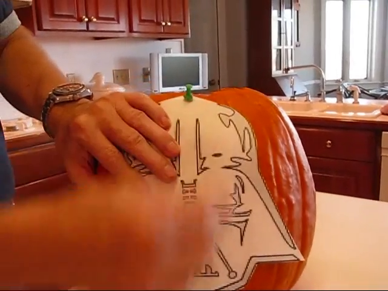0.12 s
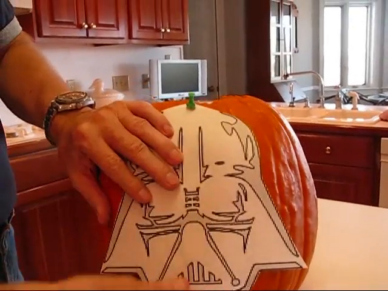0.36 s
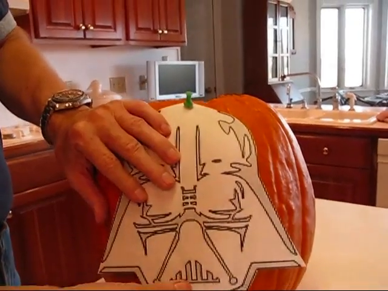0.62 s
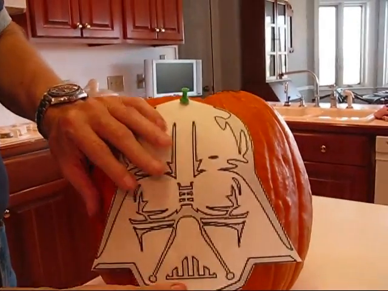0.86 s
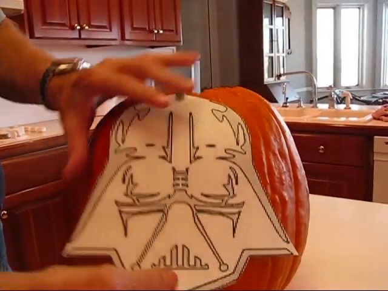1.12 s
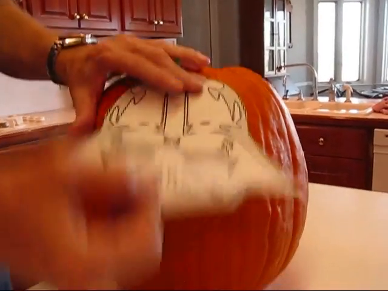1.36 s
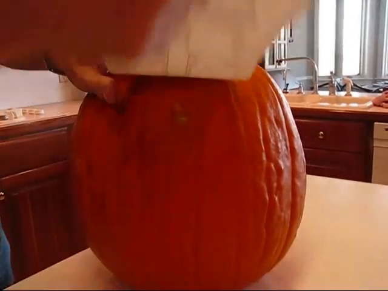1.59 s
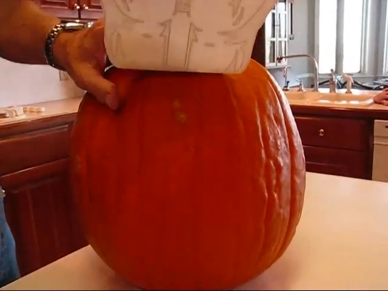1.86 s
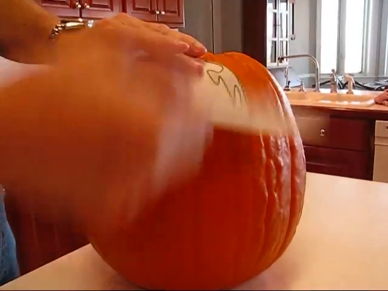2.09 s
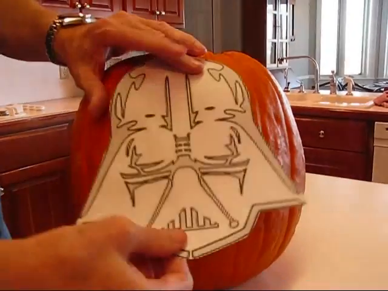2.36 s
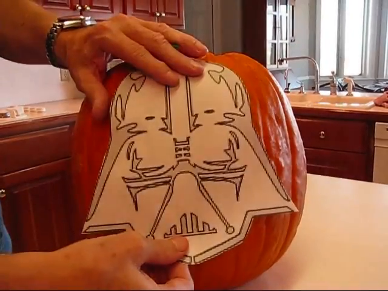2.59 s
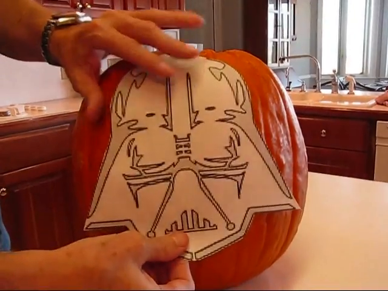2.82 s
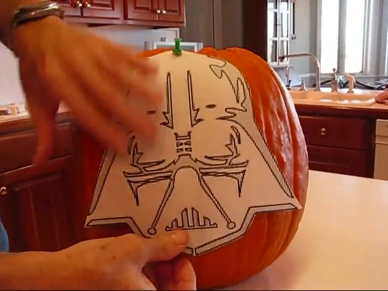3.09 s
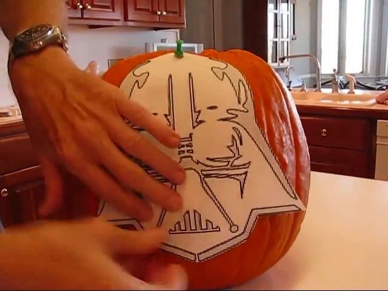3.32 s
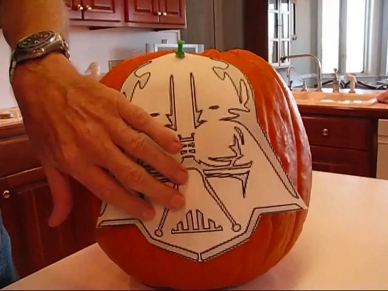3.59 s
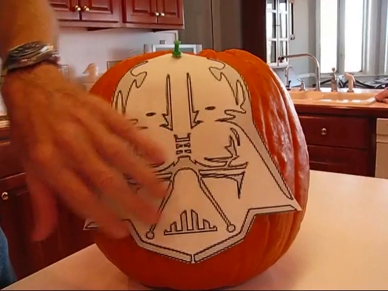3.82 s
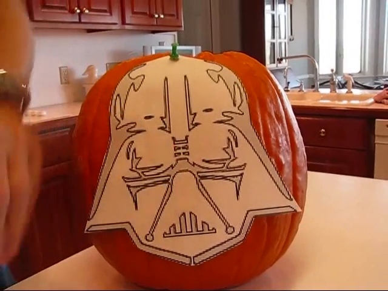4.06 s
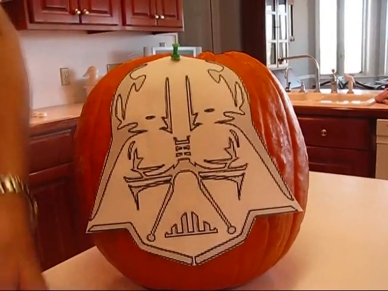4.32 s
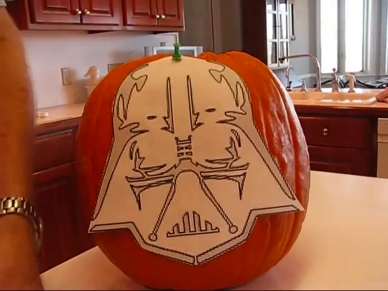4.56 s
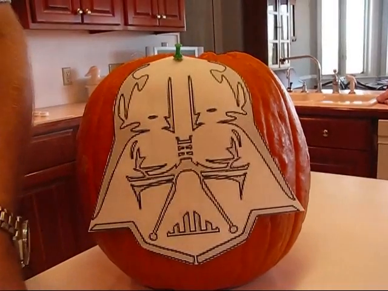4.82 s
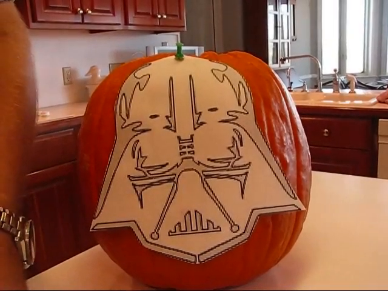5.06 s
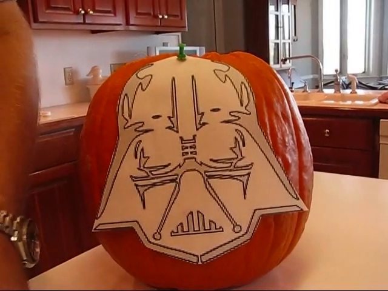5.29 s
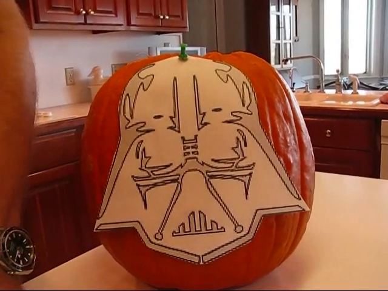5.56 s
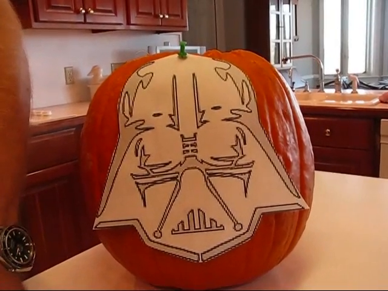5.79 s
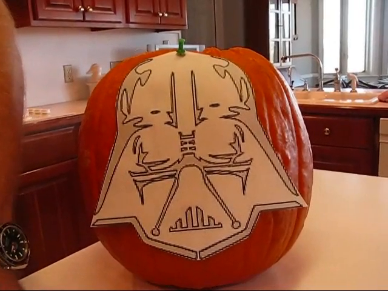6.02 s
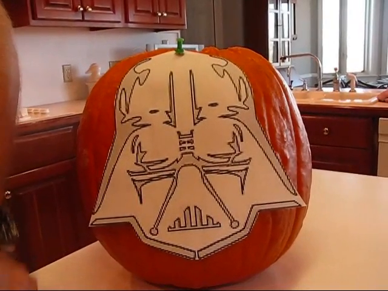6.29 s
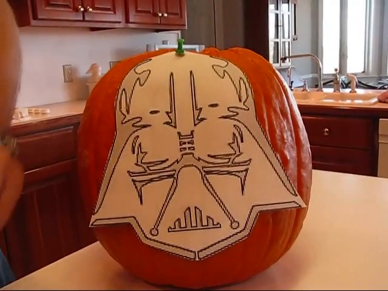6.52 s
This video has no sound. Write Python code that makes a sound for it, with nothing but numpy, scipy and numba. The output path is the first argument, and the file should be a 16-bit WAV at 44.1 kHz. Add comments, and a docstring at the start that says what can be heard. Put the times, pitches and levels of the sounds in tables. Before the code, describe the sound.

Crisp paper crackling and soft palm rubs in a kitchen, followed by small steel pins rattling loudly in a plastic tub at left.

```python
"""A fridge hums in the room air throughout, heard by a small camera in a kitchen.
First a sheet of paper is patted, lifted, laid back and smoothed on a pumpkin: coloured gritty noise, ringing cracks
and hollow modes. Then a hand, off to the left, rummages in a plastic tub of push pins: noise ticks, steel tones
and a band-passed cavity. The camera's gain control ducks after the loudest clacks."""
import sys
import numpy as np
from scipy import signal
from scipy.fft import rfft, irfft, next_fast_len
from scipy.io import wavfile
from numba import njit

SR = 44100
rng = np.random.default_rng(int(sys.argv[2]) if len(sys.argv) > 2 else 0)


def transcribe(signal):
    """Save signal, clipped to [-1, 1], as a 16-bit WAV file at the path in sys.argv[1]."""
    frames = np.atleast_2d(signal).T
    limited = np.clip(frames, -1, 1)
    pcm = np.round(limited * 32767).astype(np.int16)
    wavfile.write(sys.argv[1], SR, pcm)


def volts_from_db(level):
    """Convert decibel levels to linear amplitude ratios."""
    exponent = np.asarray(level, float) / 20
    return 10 ** exponent


N = 293432
TIME_S = np.arange(N) / SR
LEAD = 132  # samples of lead-in before the peak of a strike
STRIKE_SIZE = 4096  # samples

# strokes of hand and paper: full_s, hold_s, swell_s (to rise 20 dB; has a floor), fibre_db, sheet_db
STROKES = [(0.573, 0.021, -0.11, -51.5, -48), (0.863, 0.053, 0, -45.5, -49),
           (0.958, 0.012, -0.07, -51, -41.5), (1.08, 0, 0.16, -57, -57), (1.131, 0.0011, 0.12, -64, -53.5),
           (1.288, 0.024, -0.03, -46.5, -47.5), (1.345, 0.023, -0.0046, -48, -42.5),
           (1.375, 0.03, 0, -47, -32.5), (1.49, 0.078, 0.02, -49, -61.5), (1.563, 0.027, -0.01, -50, -38),
           (1.694, 0, 0.06, -50.5, -50.5), (1.824, 0.041, -0.06, -51, -47.5),
           (2.079, 0.14, -0.04, -43, -47.5), (2.295, 0.0022, 0.07, -41.5, -32.5),
           (2.35, 0.0039, 0.16, -67, -46.5), (2.443, 0, 0, -69, -47), (2.726, 0.007, -0.17, -55, -47.5),
           (2.822, 0.027, 0.04, -48.5, -51.5), (2.875, 0.02, 0.0448, -44, -60), (2.95, 0.167, 0, -49, -56),
           (3.142, 0, 0.0255, -33.5, -42.5), (3.34, 0.012, 0.07, -46.5, -60),
           (3.369, 0.0096, 0.06, -39.5, -33.5), (3.732, 0.004, -0.4, -50.5, -61),
           (3.79, 0.017, 0.02, -74, -49)]
# sheet rustles with a fast start, the first already dying as the sound begins:
# full_s, die_s (to fall 20 dB; has a floor), fibre_db, sheet_db
QUICK_RUSTLES = [(0.0, -0.21, -41, -39.5), (0.648, 0.03, -44, -46.5), (0.717, 0.09, -50.5, -39),
                 (0.967, 0.5, -95, -58), (1.428, 0.23, -62, -40.5), (2.244, 0.05, -58, -40),
                 (2.54, 0.11, -53, -38), (2.652, 0.07, -57, -37), (4.046, 0.23, -66, -42)]
# creases snapping: start_s, level_db (relative), pitch_hz, treble_db, body_db (both relative to the burst)
CREASE_SNAPS = [(0.588, -28.5, 1680, -20, 2), (0.647, -35, 1850, 9.5, -23.5),
                (0.722, -22.5, 1720, -10, -39), (0.911, -26, 2190, 5, -30.5), (0.969, -19.5, 1955, -32, -6),
                (1.359, -27, 1850, -6, 5), (1.43, -5.5, 1797, -39, -13.5), (1.561, -20, 1414, -21, -17),
                (1.577, -23, 1554, -29, -24), (2.08, -24.5, 1765, -37, -4), (2.242, -21, 2106, -23, -5),
                (2.253, -25.5, 1430, -21.5, 1), (2.278, -22, 1380, -30, 1), (2.284, -23.5, 2500, -6, -17),
                (2.291, -12, 1590, -37, -15), (2.297, -17, 1584, -35, -9), (2.54, -21, 1804, -6, -7),
                (2.653, -17.5, 1880, -11.5, -3.5), (2.723, -31.5, 834, -1.5, -35.5),
                (3.147, -24.5, 2090, 6.5, -3), (3.224, -38.5, 1190, -30, -20),
                (3.245, -37, 1330, -30.5, -13), (3.341, -30.5, 1490, -34, 6), (3.363, -18, 1743, 0, -32),
                (3.692, -38, 1180, -30, -19.5), (3.771, -37, 1023, -11, -15),
                (3.787, -37.5, 2990, -10.5, -24), (3.797, -39.5, 900, -30, -20),
                (3.914, -38.5, 1260, -40.5, -8), (3.986, -39.5, 1110, -27.5, 8),
                (4.011, -42, 1410, -33, -14)]
# colour of the sheet: freq_hz, level_db
SHEET_COLOUR = [(530, -4.5), (1000, -3), (1650, 1.5), (2320, -1.5), (3000, -6.5), (4000, -20.5),
                (5200, -19), (8800, -120)]
# colour of the paper fibres: freq_hz, level_db
FIBRE_COLOUR = [(1760, -34), (2500, -2.5), (3300, 1), (4400, -1.5), (5600, -4), (7000, -5.5), (9200, -7),
                (11600, -14.5), (14300, -15), (16300, -29)]
# pins sliding in the tub: time_s, hiss_db, tub_db (relative drive of the tub)
RUMMAGE = [(3.98, -81.5, -55.5), (4.03, -74, -57), (4.055, -71, -41), (4.155, -63, -60.5),
           (4.283, -50.5, -50.5), (4.33, -59.5, -52), (4.502, -52.5, -45), (4.671, -73, -56),
           (4.86, -72, -39), (4.935, -33.5, -28), (4.99, -40, -30), (5.007, -26, -22.5), (5.06, -38, -32),
           (5.259, -51, -33), (5.62, -38, -28.5), (5.69, -22.5, -21), (5.766, -26.5, -23),
           (5.82, -32, -27.5), (5.92, -54, -35.5), (6.15, -65.5, -49), (6.65, -74, -57.5)]
# pins clicking: contact_s, peak_db, brightest_hz, blow_db (relative drive of the tub)
PIN_CLICKS = [(4.045, -11, 11300, -19), (4.0685, -19.5, 11500, -55), (4.221, -27, 5930, -58.5),
              (4.2682, -21.5, 7900, -74), (4.289, -25, 5230, -31.5), (4.3816, -25.5, 5060, -37),
              (4.4658, -31.5, 9000, -37), (4.5022, -24.5, 5800, -26), (4.5263, -19, 4700, -27.5),
              (4.612, -45, 4500, -42), (4.7269, -27.5, 4750, -32.5), (4.805, -30, 10730, -27.5),
              (4.8246, -3.5, 4370, -22), (4.8496, -20, 4820, -32), (4.8901, -15.5, 10300, -14.5),
              (4.933, -8, 5700, -40), (4.999, -15, 4500, -17.5), (5.0114, -17, 5500, -32),
              (5.0154, -6, 4530, -29), (5.0318, -5, 4650, -20), (5.0458, -7, 2780, -17.5),
              (5.084, -15, 11800, -20), (5.113, -33, 4500, -26), (5.167, -14, 8000, -41),
              (5.198, -16, 12300, -47), (5.234, -14.5, 14550, -32), (5.257, -18, 7000, -30),
              (5.3, -12.5, 11200, -58), (5.3394, -13, 9800, -37), (5.361, -16.5, 11200, -30),
              (5.4038, -5, 10400, -17), (5.4174, -9, 5400, -34), (5.4232, -1, 7100, -20),
              (5.442, -28, 10000, -40), (5.458, -12, 8000, -23), (5.4725, -6, 9500, -20),
              (5.4865, -8.5, 7600, -33), (5.518, -9, 8000, -22), (5.527, -9.5, 8000, -24),
              (5.539, -11.5, 12800, -26), (5.552, -9, 8000, -27), (5.5794, -16, 10760, -23),
              (5.602, -4.5, 10620, -60), (5.6174, -3, 10530, -18), (5.647, -9, 3000, -16.5),
              (5.6531, 0.5, 6350, -30), (5.6664, -23, 10760, -9), (5.688, 2, 3830, -35),
              (5.703, 4, 4470, -37), (5.7335, 6, 5870, -18), (5.7352, 6.5, 3590, -15),
              (5.762, -9, 3590, -28), (5.813, -17, 5600, -12), (5.9357, -13, 8200, -63),
              (5.9694, -33, 12300, -31), (5.9848, -14, 12300, -57), (6.0712, -19, 11200, -32),
              (6.147, -22.5, 10620, -36), (6.24, -27, 4800, -42), (6.2895, -26, 9300, -32.5),
              (6.337, -26, 4750, -42), (6.375, -29.5, 8700, -36), (6.384, -33, 4550, -42),
              (6.458, -45, 4500, -47.5), (6.56, -52, 4500, -45)]
# tones of tub wall and steel pins: pitch_hz, level_db (relative to the click), t60_s
PIN_TONES = [(2780, 0.5, 0.037), (3590, -7, 0.022), (9000, -10, 0.045), (10530, -23.5, 0.13),
             (10620, -21, 0.12), (10760, -11, 0.14), (12800, -15, 0.05)]
# colour of sliding pins: freq_hz, level_db
PIN_COLOUR = [(2650, -104), (4500, 14.5), (7160, 11), (10000, 5), (10800, 5.5), (15200, -18), (16300, -29)]
# hollow of the tub: time_s, pitch_hz
CAVITY_PITCH = [(4, 1490), (4.8, 1320), (5.3, 1310), (5.62, 1385), (5.78, 1630), (5.84, 1610), (6.2, 1480)]
# modes of the tub: multiple of the cavity pitch, width_hz, level_db
TUB_MODES = [(1, 132, 0), (2.02, 198, -10.5), (2.7, 800, -9.5)]
# pats on the pumpkin: start_s, level_db (relative), pitch_hz
PATS = [(0.41, -14.5, 255.6), (0.413, -26, 60.3), (.447, -25.5, 199), (.478, -29.5, 255),
        (1.324, -33.5, 151), (1.33, -27, 63), (2.087, -35, 97), (3.352, -31, 86), (3.361, -27.5, 188)]
# tub bumping on the counter: start_s, level_db (relative), pitch_hz
TUB_BUMPS = [(4.046, -22.5, 270), (4.047, -27, 730), (4.079, -27.5, 200), (4.527, -30, 67.4),
             (4.685, -33.5, 186), (4.744, -29.5, 191), (4.825, -26, 215), (4.889, -28.5, 212),
             (4.997, -24, 290), (5.01, -24.5, 280), (5.136, -25, 135), (5.233, -30, 340), (5.469, -25, 222),
             (5.601, -27, 269), (5.813, -16, 217)]
# fridge drone: pitch_hz, width_hz, rms_db
FRIDGE_BANDS = [(119.8, 10, -66), (329.7, 4.2, -65.5), (870, 16, -68.5)]
# colour of the room air: freq_hz, level_db
AIR_COLOUR = [(12, -13), (20, 7), (296, -7.5), (331, -12.5), (533, -8), (812, -7), (11300, -21),
              (16300, -27)]


def unit(x):
    """Scale to rms 1."""
    return x / np.sqrt(np.mean(x ** 2))


def shape(x, points):
    """Colour by (Hz, dB) points, falling 18 dB per octave outside them."""
    hz, db = np.transpose(points)
    size = next_fast_len(x.shape[-1])
    f = np.maximum(np.arange(size // 2 + 1) * SR / size, 1)
    octaves_outside = np.maximum(np.log2(hz[0] / f), 0) + np.maximum(np.log2(f / hz[-1]), 0)
    gain = volts_from_db(np.interp(np.log(f), np.log(hz), db) - 18 * octaves_outside)
    return irfft(rfft(x, size) * gain, size)[..., :x.shape[-1]]


def ring(x, hz, t60_s):
    """One damped mode, driven by x."""
    pole = np.exp(2j * np.pi * hz / SR - np.log(1000) / (max(t60_s, .002) * SR))
    return signal.lfilter([1], [1, -pole], x).imag


def fade(t60_s, size):
    """Exponential decay."""
    return volts_from_db(-60 * np.arange(size) / SR / max(t60_s, .002))


def strike(t60_s, rise_s):
    """Envelope with a very short rise, peaking at sample LEAD, then a decay."""
    rise = np.exp(np.arange(-LEAD, 0) / (rise_s * SR))
    return np.r_[rise, fade(t60_s, STRIKE_SIZE - LEAD)]


def add(out, start_s, sound):
    """Mix a short sound in."""
    i = int(start_s * SR)
    out[i:i + len(sound)] += sound[:N - i]


def grit(per_s, spread_db, smear_s, even):
    """Noise broken into tiny slips of uneven size, each with a short tail, over an even share."""
    size = np.minimum(rng.exponential(size=N), 4)
    slips = (rng.random(N) < per_s / SR) * volts_from_db(spread_db * size)
    swell = signal.lfilter([1], [1, -np.exp(-1 / (smear_s * SR))], slips)
    return unit(rng.standard_normal(N) * (swell + even * swell.mean()))


def curves(table):
    """Level columns as gains for each sample, silent outside the table's times."""
    time_s, *columns = np.transpose(table)
    return [volts_from_db(np.interp(TIME_S, time_s, c, left=-np.inf, right=-np.inf)) for c in columns]


@njit
def band(x, hz, width):
    """State-variable band-pass with a moving centre, gain 1 there."""
    y, b, l = np.empty(len(x)), 0., 0.
    for i in range(len(x)):
        g, k = np.tan(np.pi * hz[i] / SR), width / hz[i]
        v = (b + g * (x[i] - l)) / (1 + g * (g + k))
        b, l, y[i] = 2 * v - b, l + 2 * g * v, k * v
    return y


def noise_band(hz, width_hz):
    """Steady narrow band of noise, rms 1."""
    return unit(band(rng.standard_normal(N), np.full(N, 1. * hz), 1. * width_hz))


def arch(start_s, stop_s):
    """Smooth swell from 0 to 1 and back."""
    return np.sin(np.pi * np.interp(TIME_S, [start_s, stop_s], [0, 1])).clip(0) ** .5


def paper():
    """Rubbing shakes sheet, fibres and rind; creases crack as they let go."""
    rub, shake = strokes()
    sheet = unit(shape(grit(per_s=900, spread_db=3, smear_s=.002, even=.5), SHEET_COLOUR))
    fibres = unit(shape(grit(per_s=800, spread_db=4, smear_s=.002, even=2.5), FIBRE_COLOUR))
    rind_colour = [(70, -11), (200, 4), (550, 2.5), (900, -5)]  # (Hz, dB)
    rind = unit(shape(grit(per_s=330, spread_db=3, smear_s=.0046, even=.99), rind_colour))
    rubbing = rub * fibres + shake * (sheet + volts_from_db(-9) * rind)
    return rubbing + palm_glide(fibres) + crease_snaps()


def strokes():
    """Gains of fibres and sheet: strokes swell, hold and die; rustles start fast; a resting hand lies under."""
    quickest_s, rustle_swell_s = .012, .006
    fade_share = .9  # dying away takes this share of the swell time
    roundness = 1.4  # 1 = pointed swell, 2 = bell
    resting = (TIME_S > .34) & (TIME_S < 6)
    gains = volts_from_db(np.array([-64, -65.5]))[:, None] * resting
    rows = [(full, hold, max(swell, quickest_s), fade_share * swell, db)
            for full, hold, swell, *db in STROKES]
    rows += [(full, 0, rustle_swell_s, die, db) for full, die, *db in QUICK_RUSTLES]
    for full_s, hold_s, swell_s, die_s, db in rows:
        before = (full_s - TIME_S) / swell_s
        after = (TIME_S - full_s - hold_s) / max(die_s, quickest_s)
        away = np.maximum(before, after).clip(0)
        near = away < 3
        gains[:, near] += volts_from_db(np.array(db)[:, None] - 20 * away[near] ** roundness)
    return gains


def palm_glide(fibres):
    """The palm glides down the sheet: the hiss swells smoothly while its colour climbs."""
    start_s, stop_s, level_db = 2.92, 3.16, -41.5
    hz = np.interp(TIME_S, [start_s, stop_s], [5200., 7200.])
    hiss = band(band(fibres, hz, 4500.), hz, 4500.)
    return volts_from_db(level_db) * arch(start_s, stop_s) * unit(hiss)


def crease_snaps():
    """Each crease lets go with a sharp crack, a weaker flutter of the freed sheet and a brief ring."""
    out = np.zeros(N)
    t = TIME_S[:STRIKE_SIZE]
    burst = strike(.031 / 1.8, rise_s=.00025) + .16 * strike(.0496, rise_s=.00041)
    ring_fade = strike(.0527, rise_s=.00065)
    noises = rng.standard_normal((len(CREASE_SNAPS), 3, STRIKE_SIZE))
    for (start_s, db, hz, treble_db, body_db), noise in zip(CREASE_SNAPS, noises):
        colour = [(hz / 1.3, -14), (hz, 0), (hz * 1.35, -9), (hz * 1.75, -2), (hz * 2.6, -16)]
        sines = np.sin(2 * np.pi * hz * t) + .5 * np.sin(2 * np.pi * 1.75 * hz * t)
        tone = unit(shape(noise[0], colour)) + 1.28 * sines * ring_fade
        treble = volts_from_db(treble_db) * unit(shape(noise[1], FIBRE_COLOUR[1:]))
        body = volts_from_db(body_db) * unit(shape(noise[2], [(250, -26), (900, -16.5)]))
        add(out, start_s + .001044 - LEAD / SR, volts_from_db(db - 7.5) * burst * (tone + treble + body))
    return out


def pins():
    """Pins slide and click; every contact rings the tub's cavity, whose pitch shifts with the hand inside."""
    hiss, rattle = curves(RUMMAGE)
    wobble = unit(shape(rng.standard_normal(N), [(6, 0), (25, 0)]))  # fingers shift
    cavity_hz = np.interp(TIME_S, *np.transpose(CAVITY_PITCH)) * (1 + .025 * wobble)
    slide = grit(per_s=400, spread_db=4.5, smear_s=.0015, even=.5)
    skitter = grit(per_s=450, spread_db=5, smear_s=.0007, even=.2)
    clicks, blows = pin_clicks()
    drive = volts_from_db(8.5) * rattle * slide + blows
    cavity = sum(volts_from_db(db) * band(drive, k * cavity_hz, 1. * width_hz) for k, width_hz, db in TUB_MODES)
    plastic_colour = [(180, -8.5), (400, -12), (800, -20), (2500, -5), (4200, -9.5), (6000, -8.5)]  # (Hz, dB)
    plastic = shape(drive, plastic_colour)
    return clicks + cavity + plastic + hiss * unit(shape(skitter, PIN_COLOUR))


def pin_clicks():
    """Contacts give a noise tick, ring tones of nearby pitch and deal the tub a blow: clicks, blows."""
    nearby_octaves = .019
    clicks, blows = np.zeros(N), np.zeros(N)
    size = 16384
    tones = np.array([volts_from_db(db) * fade(t60_s, size) * np.sin(2 * np.pi * hz * TIME_S[:size])
                      for hz, db, t60_s in PIN_TONES])
    tone_hz = np.array(PIN_TONES)[:, 0]
    tick_fade = strike(.0025, rise_s=.00011) + .082 * strike(.11, rise_s=.0004)
    blow_fade = strike(.012, rise_s=.000073)
    touches = PIN_CLICKS + small_clicks(count=130)
    noises = rng.standard_normal((len(touches), 2, STRIKE_SIZE))
    for (contact_s, db, hz, blow_db), noise in zip(touches, noises):
        tick = shape(noise[0] * tick_fade, [(hz / 2, -8), (hz, 0), (15500, -11)])
        add(clicks, contact_s - LEAD / SR, volts_from_db(db) * tick / abs(tick).max())
        add(blows, contact_s - LEAD / SR, volts_from_db(blow_db + 11.5) * noise[1] * blow_fade)
        near = np.exp(-(np.log2(hz / tone_hz) / nearby_octaves) ** 2)
        add(clicks, contact_s, volts_from_db(db) * near @ tones)
    return clicks, blows


def small_clicks(count):
    """Random rows like PIN_CLICKS: denser where the tub is driven hardest, ticks louder where pins hiss more."""
    time_s, hiss_db, tub_db = np.transpose(RUMMAGE)
    busy = np.cumsum(np.sqrt(curves(RUMMAGE)[1]))
    when, size, pitch = rng.random((count, 3)).T
    contact_s = np.interp(when, busy / busy[-1], TIME_S)
    extra_db = 6 * np.minimum(-np.log(size), 2)
    peak_db = np.interp(contact_s, time_s, hiss_db) + 3 + extra_db
    blow_db = np.interp(contact_s, time_s, tub_db) - 13 + extra_db
    return list(zip(contact_s, peak_db, 4500 * 2.7 ** pitch, blow_db))


def pats():
    """Pats ring the hollow pumpkin."""
    return knocks(PATS, t60_s=.08, push_cycles=.66, upper=1.7)


def tub_bumps():
    """The tub bumps on the counter, a shorter ring."""
    return knocks(TUB_BUMPS, t60_s=.026, push_cycles=.26, upper=1.51)


def knocks(table, t60_s, push_cycles, upper):
    """A soft push rings a hollow mode with one above and one below; slow motion does not radiate."""
    out = np.zeros(N)
    for start_s, db, hz in table:
        push = np.zeros(12000)
        size = int(push_cycles * SR / hz)
        push[:size] = np.hanning(size) * 2 / size
        rings = ring(push, hz, t60_s)
        rings += .68 * ring(push, upper * hz, .75 * t60_s)
        rings += .25 * ring(push, .745 * hz, t60_s)
        add(out, start_s, volts_from_db(db) * highpass(rings, .71 * hz))
    return highpass(out, 45)


def highpass(x, hz):
    """Second-order high-pass."""
    return signal.sosfilt(signal.butter(2, hz, "highpass", fs=SR, output="sos"), x)


def room(x):
    """Counter and cupboards scatter at once, walls add a tail whose treble lingers longest; ports differ."""
    size = int(.5 * SR)
    noise = rng.standard_normal((2, 2, size))
    tail = shape(noise[0], [(700, -1.8), (3000, -1.4)]) * fade(.1, size)
    tail += .49 * shape(noise[1], [(3000, -.69), (14000, 1.6)]) * fade(.17, size)
    tail /= np.sqrt(np.sum(tail ** 2) / 2)
    walls = volts_from_db(-8) * signal.fftconvolve(x[None], tail, axes=1)[:, :N]
    return walls + volts_from_db(-5) * scatter(x, [(3000, 0), (14000, 0)], t60_s=.008)


def scatter(x, points, t60_s):
    """Short early reflections, two ports; the pattern is redrawn at random every 1024 samples."""
    hop, size = 1024, 1024
    count = N // hop + 2
    echoes = shape(rng.standard_normal((count, 2, size)), points) * fade(t60_s, size)
    echoes = echoes / np.sqrt(np.sum(echoes ** 2, axis=2, keepdims=True))
    padded = np.pad(x, (hop, 3 * hop))
    pieces = np.lib.stride_tricks.sliding_window_view(padded, 2 * hop)[::hop][:count]
    window = np.sin(np.pi * np.arange(2 * hop) / (2 * hop))
    wet = signal.fftconvolve((pieces * window)[:, None], echoes, axes=2)
    out = np.zeros((2, (count + 3) * hop))
    for k, piece in enumerate(wet):
        out[:, k * hop:k * hop + piece.shape[1]] += piece
    return out[:, hop:hop + N]


def fridge():
    """The fridge drones in narrow bands of noise, alike in both ports."""
    return sum(volts_from_db(db) * noise_band(hz, width_hz) for hz, width_hz, db in FRIDGE_BANDS)


def faint_hiss():
    """One soft narrow band comes and goes."""
    return volts_from_db(-59) * arch(start_s=3.5, stop_s=5) * noise_band(hz=1853, width_hz=128)


def air():
    """Room tone and microphone hiss: lows mostly alike in both ports, treble unrelated."""
    shared = shape(rng.standard_normal(N), [(100, -8), (200, 6.5), (900, 3), (2500, 2.5)])
    bed = shape(shared + 1.6 * rng.standard_normal((2, N)), AIR_COLOUR)
    return volts_from_db(-52) * unit(bed)


def from_left(x):
    """The left port hears the tub first; the camera body shades the far port."""
    lag_s = 8e-5
    size = next_fast_len(N)
    hz = np.arange(size // 2 + 1) * SR / size
    late = irfft(rfft(x, size) * np.exp(-2j * np.pi * hz * lag_s), size)[:N]
    late = shape(late, [(10, -4), (6000, 1.5), (16000, -9), (22000, -16)])
    return np.array([volts_from_db(.5) * x, late])


def scene():
    """Paper and knocks ahead, the tub's pins to the left, all in the room."""
    ahead = paper() + pats() + tub_bumps()
    left = pins()
    return ahead + from_left(left) + room(ahead + left) + air() + fridge() + faint_hiss()


@njit
def follow(x, attack, release):
    """Peak follower, quick to rise and slow to fall."""
    e, out = 0., np.empty(len(x))
    for i in range(len(x)):
        e += (x[i] - e) * (attack if x[i] > e else release)
        out[i] = e
    return out


def band_limit(x):
    """A steep low-pass at the top of the band."""
    return signal.sosfilt(signal.butter(12, 16480, fs=SR, output="sos"), x)


def record(dry):
    """Gain control turns down after loud peaks and recovers slowly; the top clips."""
    attack_s, release_s, knee_db = .00084, .75, -8.5
    peak = follow(abs(dry).max(axis=0), 1 / (attack_s * SR), 1 / (release_s * SR))
    gain = (1 + (peak / volts_from_db(knee_db)) ** 4) ** -.25
    mix = np.clip(dry * gain, -1, 1)
    return band_limit(mix)


dry = scene()
out = record(dry)
transcribe(out)
```